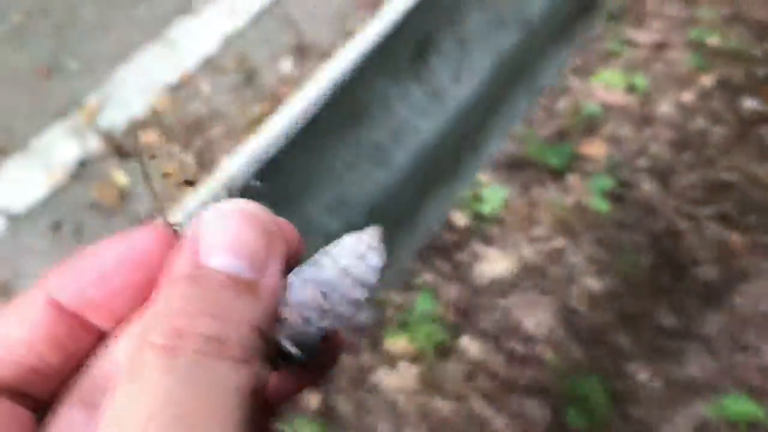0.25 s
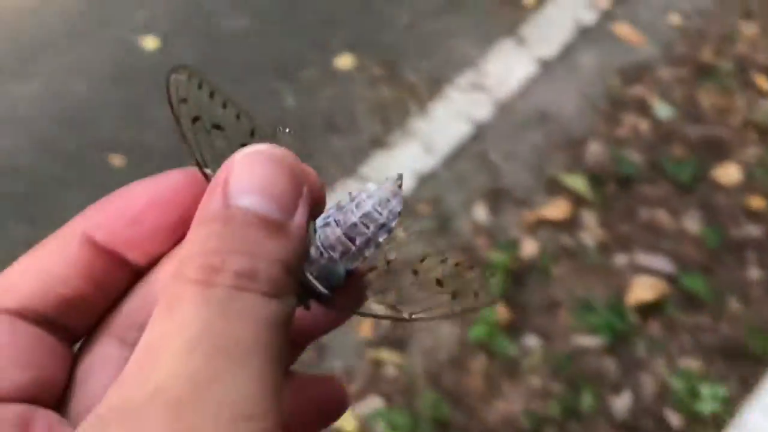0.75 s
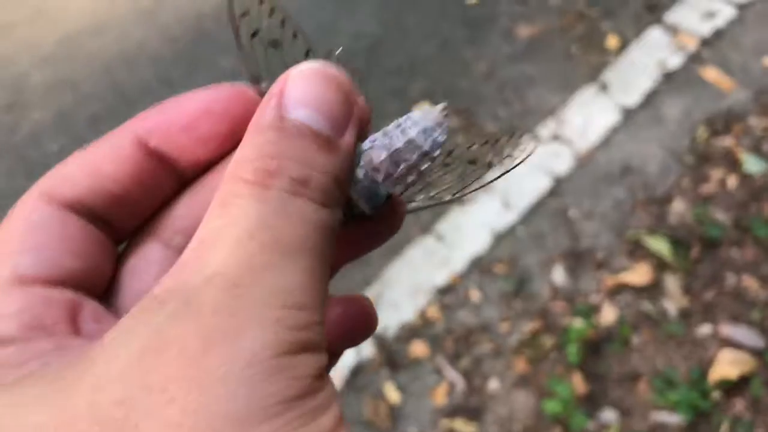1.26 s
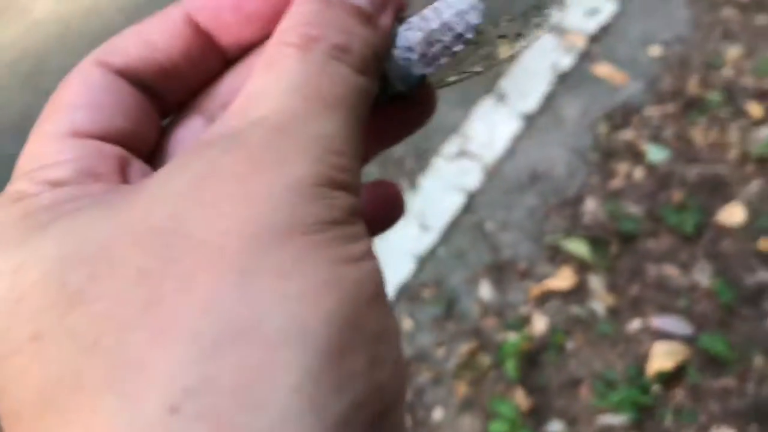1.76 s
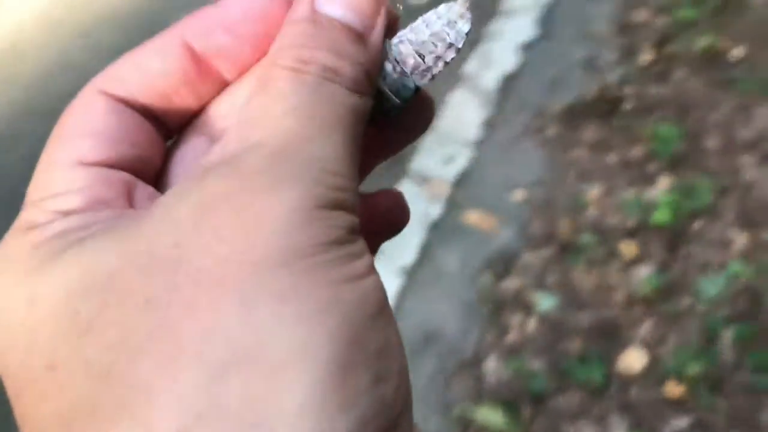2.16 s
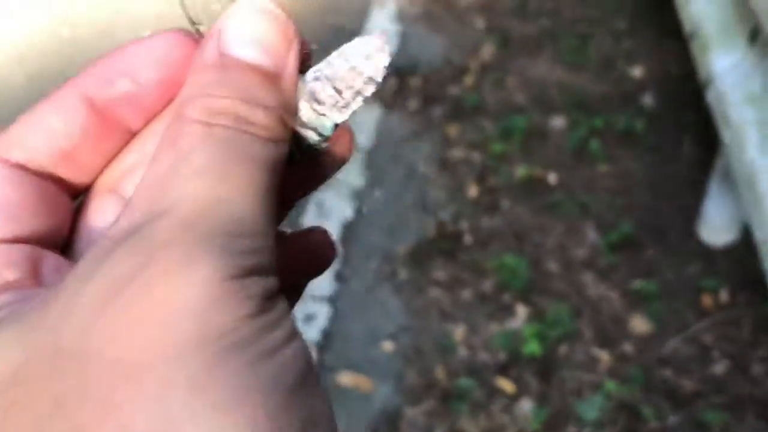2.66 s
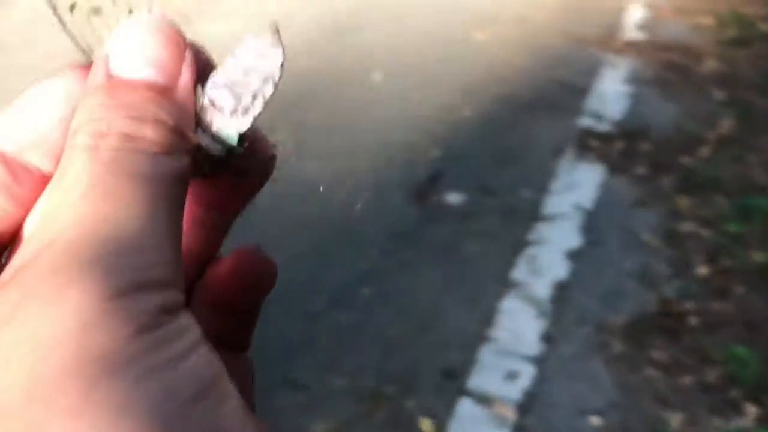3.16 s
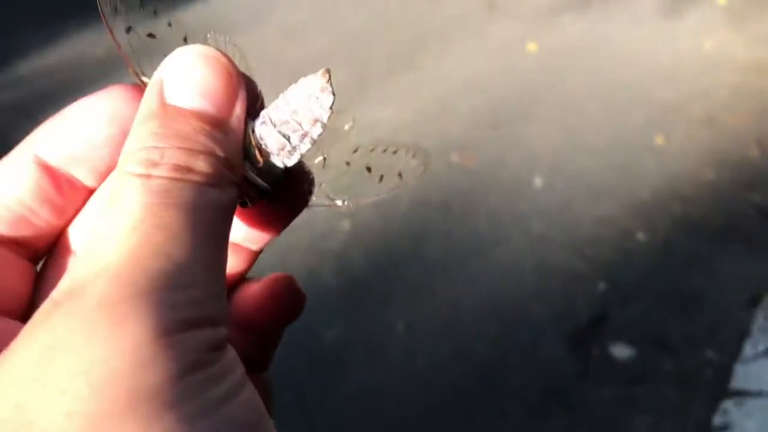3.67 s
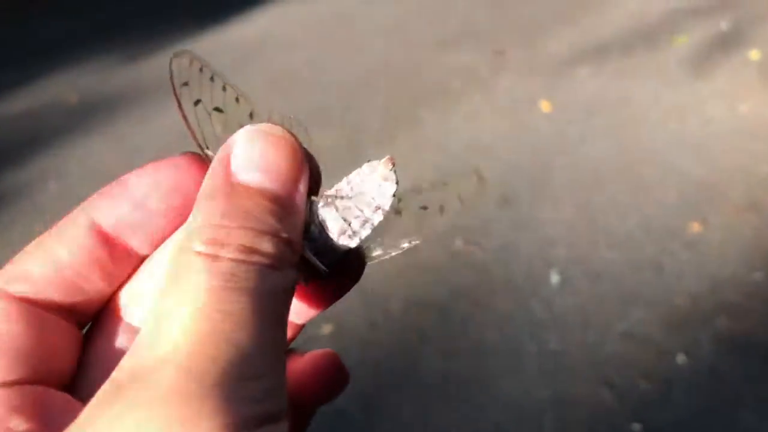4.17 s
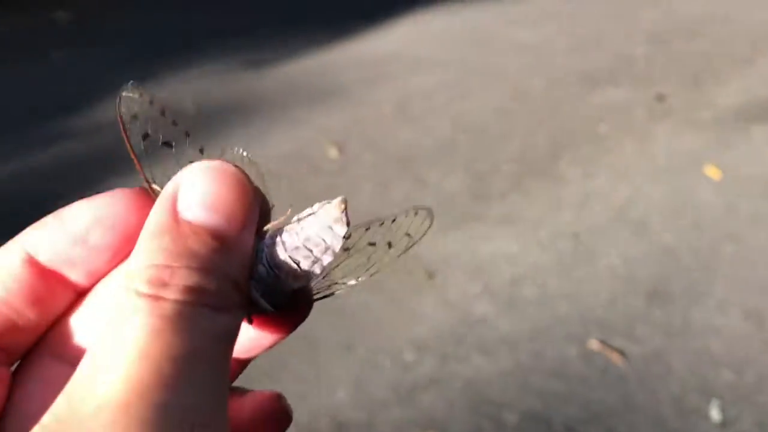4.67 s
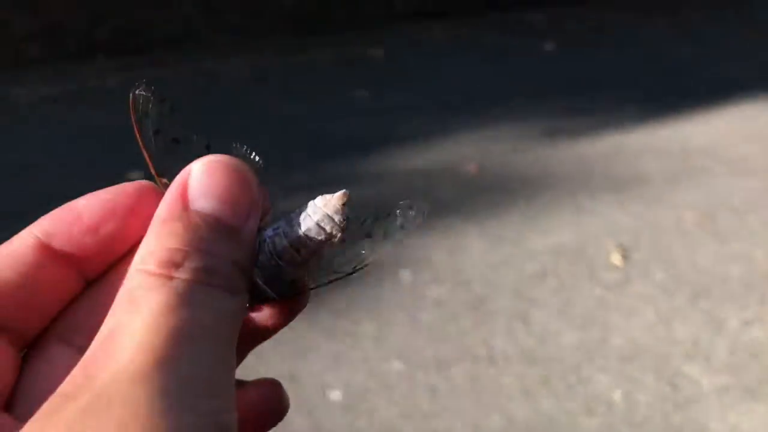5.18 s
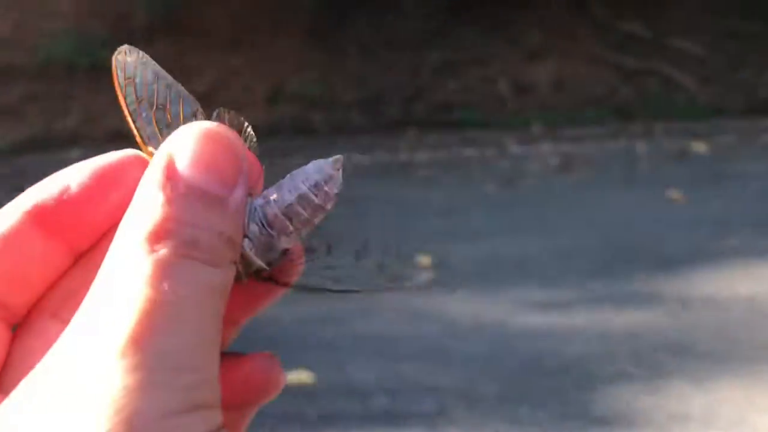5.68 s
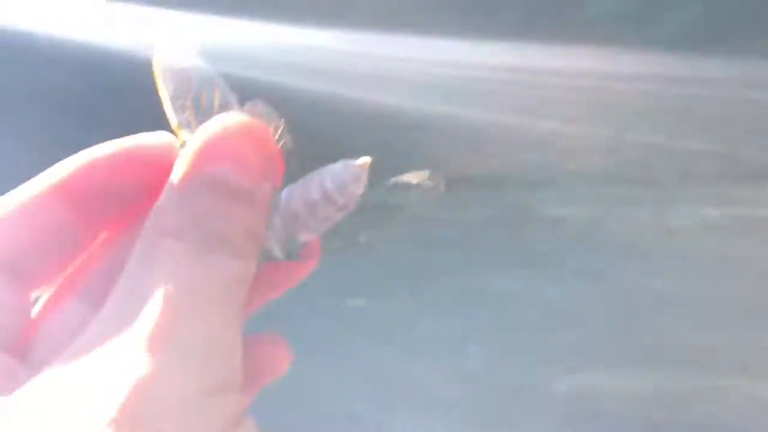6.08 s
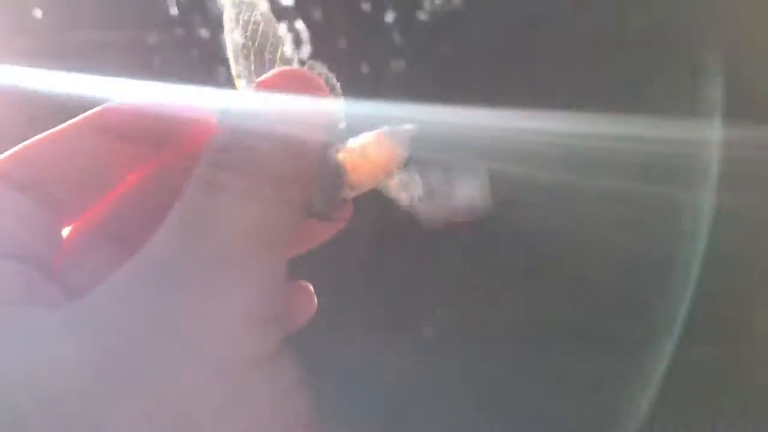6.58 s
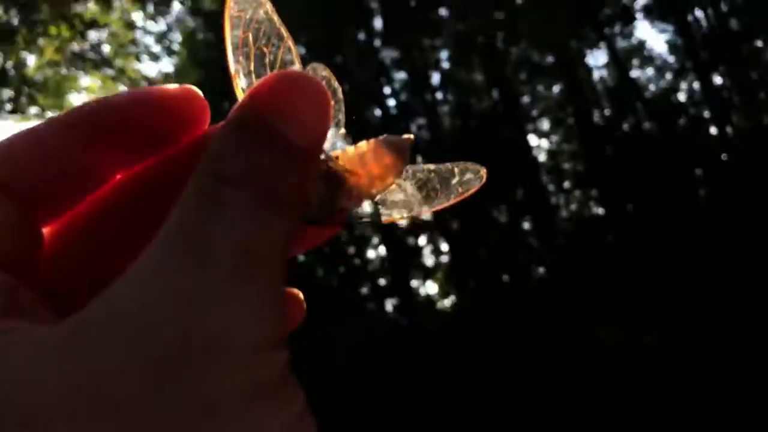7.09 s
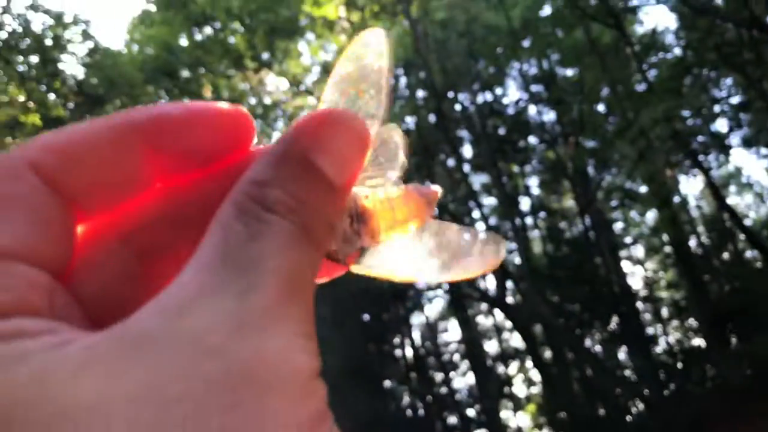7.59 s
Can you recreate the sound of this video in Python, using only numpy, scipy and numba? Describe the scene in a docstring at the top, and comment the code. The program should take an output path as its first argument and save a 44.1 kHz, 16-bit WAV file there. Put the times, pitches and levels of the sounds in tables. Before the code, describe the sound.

A cicada held in the fingers close to the microphone squawks in short, bright buzzing chirps, three or four a second, each a fast burst of ringing clicks. Single clicks and soft papery wing flicks fall between. Midway the chirps become duller, then dry and rough near six seconds, then bright again. A high, steady hiss of distant cicadas fills the woodland roadside, dipping under each loud chirp.

```python
"""Woodland road, a cicada held between the fingers a hand's length from the microphone; far chorus all through.
From the start it gives short chirps, its two tymbals buckling in turn about 260 times a second, each click a
2 kHz ring rich in overtones; lone clicks fall between, and the wings rustle and flick the fingers.
From 4 s the abdomen is mostly closed; three rough, dry chirps come near 6 s, then open, bright ones to the end.
The recorder's gain control pushes the chorus down at the chirps and lets it back up in the longer pauses."""
import sys
import numpy as np
from scipy import signal
from scipy.fft import rfft
from scipy.io import wavfile
from scipy.ndimage import uniform_filter1d, minimum_filter1d
from numba import njit

SR = 44100
rng = np.random.default_rng(int(sys.argv[2]) if len(sys.argv) > 2 else 0)


def materialize(psi):
    """Save the field psi as 16-bit PCM at rate SR to the path in sys.argv[1].

    A 1-D psi becomes a single channel; in a 2-D psi each row is a channel.
    """
    bounded = np.clip(np.atleast_2d(psi).T, -1, 1)
    quanta = np.round(bounded * 32767).astype(np.int16)
    wavfile.write(sys.argv[1], SR, quanta)


N = 345744
TIME = np.arange(N) / SR  # s

# Levels stand ahead of the recorder's gain control. Noise colours are relative: noise() scales them to rms 1.
# distant chorus, level before its shimmer: (time [s], level [dB])
CHORUS_LEVEL = [(0, -39.5), (2, -35), (3, -38.5), (4, -35), (6, -33.5), (7.84, -36.5)]
# colour of the distant chorus: (frequency [Hz], level [dB])
CHORUS_COLOUR = [(2500, -56), (3700, -28.5), (4400, -16.5), (5300, -13.5), (6200, -8), (7600, -4),
                 (8350, 2), (9200, -6), (10200, -17.5), (11500, -24), (13500, -18.5), (16000, -24)]
# speed of the chorus's shimmer: (frequency [Hz], level [dB])
SHIMMER_COLOUR = [(2, 14), (60, -3.5), (250, -1), (600, -64.5)]
# colour of low rumble and still air: (frequency [Hz], level [dB])
AIR_COLOUR = [(20, -40), (40, -15.5), (65, 1.5), (110, -5), (250, -10.5), (600, -20.5), (1000, -11.5),
              (1600, -17), (3000, -16.5), (8000, -24.5)]

# how hard the wings struggle, a gain on their rustle and the low flutter: (time [s], level [dB])
STRUGGLE_LEVEL = [(0, 10), (.8, 3), (1.4, -1.5), (2.2, 9), (2.9, 3), (3.8, -2), (4.6, 5.5), (5.6, 2.5),
                  (6.3, -1), (7.1, -11.5), (7.8, 5)]
# colour of wings brushing the fingers, and speed of its patches: (frequency [Hz], level [dB])
RUSTLE_COLOUR = [(80, -4), (300, 2), (1200, -9), (3000, -10), (7000, -19.5)]
PATCH_COLOUR = [(2, -14), (8, -14), (40, -1), (200, -58.5), (1000, -91.5)]
# colour of the low flutter: (frequency [Hz], level [dB])
FLUTTER_COLOUR = [(20, -5), (45, 1), (70, 5), (130, -7), (400, -21.5), (1500, -76.5)]
# the loudest wing flicks, relative to each other: (time [s], level [dB])
FLICKS = [(0.36, -33), (0.516, -37), (.708, -33), (3.467, -43), (4.147, -32.5), (4.53, -27.5),
          (4.611, -28.5), (4.641, -33.5), (4.968, -32.5), (5.450, -31), (5.652, -35.5), (7.304, -40.5),
          (7.743, -37.5)]
# colour of a flick's papery rustle: (frequency [Hz], level [dB])
PAPER_COLOUR = [(60, 3.5), (400, -3.5), (1100, -4.5), (2000, -3), (6000, -21)]

# chirps: (start [s], end [s], swell time [s], full level [dB], abdomen opening [0-1], roughness [0-1])
CHIRPS = [(0.061, 0.151, .022, -6, 0.83, 0.25), (.331, 0.419, .018, -6, 0.83, 0.09),
          (.912, 1.036, .036, -9.5, 0.62, 0.32), (1.198, 1.274, 0.014, -6.5, 0.55, 0.04),
          (1.442, 1.549, 0.036, -5, 0.54, 0.15), (1.968, 2.052, .008, -6.5, 0.1, 0),
          (2.191, 2.286, .026, -6.5, 0.5, 0), (2.452, 2.554, 0.019, -5, 0.78, 0.11),
          (2.7, 2.77, 0.014, -6.5, 0.83, 0.16), (2.917, 3.014, 0.025, -5, .85, 0.2),
          (3.203, 3.271, 0.013, -6.5, 0.78, 0.01), (3.515, 3.607, 0.025, -3.5, 0.81, .1),
          (3.834, 3.912, .016, -5, 0.5, 0), (4.209, 4.281, .01, -6, 0.26, 0.18),
          (4.53, 4.603, 0.0066, -6.5, 0.07, 0.03), (4.841, 4.908, 0.011, -7, 0.26, 0.17),
          (5.131, 5.213, .012, -7, 0.13, 0), (5.37, 5.45, 0.01, -8, .05, 0.3),
          (5.792, 5.85, .01, -10.5, 0.14, 0.77), (6.088, 6.153, .012, -9.5, 0.15, 0.76),
          (6.341, 6.423, .024, -11.5, 0.64, 0.68), (6.571, 6.657, 0.022, -5.5, 0.86, 0),
          (6.91, 6.993, 0.0089, -5, .7, 0), (7.318, 7.387, 0.0087, -7, 0.67, 0.06),
          (7.597, 7.688, 0.015, -10, .7, 0), (7.774, 7.855, 0.023, -3.5, 0.96, 0.03)]
# lone clicks between the chirps: (time [s], level [dB])
LONE_CLICKS = [(0.015, -21.5), (.053, -12.5), (.16, -7.5), (.429, -7.5), (.437, -7), (1.172, -15.5),
               (1.177, -13.5), (1.556, -5.5), (1.722, -14.5), (1.732, -13.5), (1.737, -12.5), (1.925, -18),
               (2.58, -7), (3.142, -18.5), (4.181, -13.5), (4.471, -12.5), (4.485, -11.5), (4.518, -12.5),
               (4.522, -7.5), (4.751, -14), (4.819, -15), (4.832, -15.5), (5.102, -15.5), (5.125, -16),
               (5.353, -12.5), (5.691, -18.5), (5.76, -20), (5.783, -22), (6.17, -9), (7.188, -17.5),
               (7.308, -14), (7.398, -5)]
# partials of the ring: (multiple of its pitch, level, abdomen closed [dB], level, abdomen open [dB])
PARTIALS = [(1.03, -7.5, -13.5), (2.015, -2.5, -0.5), (2.925, -4.5, -6.5), (4.04, -19.5, 1),
            (4.91, -12.5, -7.5), (5.94, -22.5, -16), (6.85, -26.5, -24.5)]
# colour of the buckling ribs' rasp: (frequency [Hz], level [dB])
RASP_COLOUR = [(100, -29.5), (950, -26.5), (1450, -23.5), (2150, -10), (2800, -5.5), (4500, 4), (6200, -3),
               (7400, -1.5), (9300, 10), (11300, -3), (16000, -7.5)]
# colour of a tymbal springing back after its click: (frequency [Hz], level [dB])
REBOUND_COLOUR = [(300, -42), (1300, -17.5), (2300, -19), (3100, -14.5), (4500, -9), (5400, 7), (6100, 19),
                  (7300, -18), (9200, -3.5), (10800, -6), (12200, -2), (13800, -13), (15300, -7.5)]

CLICK_HZ = 262  # nominal clicks per second of both tymbals together
RING_HZ = 2079  # nominal pitch of a tense tymbal, ahead of climb, settling and partial multiples
LIMP_DB = -19.5  # level of the first, limp click of a chirp
DETUNE = .003  # click-to-click pitch scatter [share] in a smooth chirp
RISE_S = .0011  # time constant of a click's swell, abdomen closed
ROUGH_STRETCH = .05  # share by which high partials go sharp at full roughness
DIP_HZ, DIP_WIDTH_HZ = 2800, 600  # the body's weak band
LINGER_HZ, LINGER_DB = 2130, -54  # lingering ring: pitch, response level against the call
HAND_DB = -18  # response level of the hand's scatter against the call
WOODS_DB, WOODS_T60_S = -37.5, .26  # echo from the trees: response level against the call, 60 dB decay
TOP_HZ = 15850  # top of the recorder's band


def undb(db):
    """Decibels to gain."""
    return 10 ** (np.asarray(db) / 20)


def unit(x):
    """Scale to rms 1."""
    return x / np.sqrt(np.mean(x ** 2))


def add(track, sound, at):
    """Mix a sound into a track from a sample index on."""
    at = max(at, 0)
    part = sound[:max(len(track) - at, 0)]
    track[at:at + len(part)] += part


def noise(colour):
    """Noise of rms 1, its spectrum shaped by a (Hz, dB) colour over log frequency."""
    hz, db = np.transpose(colour)
    f = np.maximum(np.fft.rfftfreq(N, 1 / SR), 1)
    gain = undb(np.interp(np.log(f), np.log(hz), db))
    white = rfft(rng.standard_normal(N))
    return unit(np.fft.irfft(white * gain, N))


def woodland(shimmer_db=0.4, air_db=-55.5):
    """Many far cicadas merge into a shimmering hiss over a low rumble of air."""
    level_db = np.interp(TIME, *np.transpose(CHORUS_LEVEL))
    shimmer = noise(SHIMMER_COLOUR)
    chorus = noise(CHORUS_COLOUR) * undb(level_db + shimmer_db * shimmer)
    return chorus + noise(AIR_COLOUR) * undb(air_db)


def struggle():
    """Gain of the wings' effort over time."""
    return undb(np.interp(TIME, *np.transpose(STRUGGLE_LEVEL)))


def wing_rustle(base_db=-65.0, patchy_db=5.0):
    """The wings brush the fingers in faint, uneven patches; the struggle scales them later."""
    touch = np.minimum(noise(PATCH_COLOUR), 2)
    return undb(base_db + patchy_db * touch) * noise(RUSTLE_COLOUR)


def wing_flicks(start_hz=1284.0, fall_s=0.00432, decay_s=0.005, rise_s=0.00019, rustle=0.56, slap_db=2.5):
    """A wing slaps the fingers: a soft tap that falls quickly in pitch, with a papery rustle."""
    out, t = np.zeros(N), TIME[:SR // 25]
    paper = noise(PAPER_COLOUR)
    tap = np.sin(2 * np.pi * start_hz * fall_s * (1 - np.exp(-t / fall_s)))
    envelope = (1 - np.exp(-t / rise_s)) * np.exp(-t / decay_s)
    for s, db in FLICKS:
        at = int(s * SR)
        slap = tap + rustle * paper[at:at + len(t)]
        add(out, undb(db + slap_db) * envelope * slap, at)
    return out


def low_flutter(call, base_db=-45.0, smear_s=0.063, lag_s=0.019):
    """A soft low flutter follows each chirp's smeared power; the struggle scales it later."""
    power = uniform_filter1d(call ** 2, int(smear_s * SR))
    strength = np.sqrt(np.abs(np.interp(TIME - lag_s, TIME, power)))
    return undb(base_db) * strength * noise(FLUTTER_COLOUR)


def after_ring(call, ring_t60_s=0.46, hand_t60_s=0.03):
    """The hand and the trees scatter a little sound back, and a faint ring lingers near the call's pitch."""
    t = TIME[:SR // 3]
    ring = np.sin(2 * np.pi * LINGER_HZ * t) * undb(-60 * t / ring_t60_s)
    hand = rng.standard_normal(len(t)) * undb(-60 * t / hand_t60_s)
    woods = rng.standard_normal(len(t)) * undb(-60 * t / WOODS_T60_S)
    tails = ((ring, LINGER_DB), (hand, HAND_DB), (woods, WOODS_DB))
    response = sum(undb(db) * tail / np.linalg.norm(tail) for tail, db in tails)
    return signal.oaconvolve(call, response)[:N]


def click_train(swell_shape=1.5, slack=.17, sag=0.059, climb=0.01, lopsided=0.039, open_lopsided=.12,
                pace_scatter=.012, tiring=.04, jitter_s=.00003, rough_jitter_s=.00012, scatter_db=0.92,
                tense_db=-5.5, tense_range_db=12.0, dull_db=-2.5, limp_closing=0.94,
                hitch_at=.5, hitch=.14, slow_start_s=.019):
    """Every click as muscles tense the tymbals: (s, dB, pitch Hz, opening, roughness, dB per overtone)."""
    clicks = []
    for s, db in LONE_CLICKS:
        # the softer a lone click, the flatter and duller
        limp = np.clip((tense_db - db) / tense_range_db, 0, 1)
        # the abdomen keeps the pose of the chirp whose end is nearest
        opening = min(CHIRPS, key=lambda chirp: abs(chirp[1] - s))[4]
        pitch = RING_HZ * (1 - climb - sag * limp)
        clicks.append((s, db, pitch, opening * (1 - limp), 0, dull_db * limp))
    for start, end, swell_s, db, opening, rough in CHIRPS:
        s = start
        pace = CLICK_HZ * (1 + pace_scatter * rng.standard_normal())
        caught = swell_s < slow_start_s
        for k, (late, loud) in enumerate(rng.standard_normal((40, 2))):
            if s > end + 1 / CLICK_HZ / 2:
                break
            # until the muscles tense, clicks are slow, soft, flat and dull
            limp = np.exp(-((s - start) / swell_s) ** swell_shape)
            along = (s - start) / (end - start) - .5
            pitch = RING_HZ * (1 - sag * limp + climb * along)  # tension keeps growing to the end
            when = s + (jitter_s + rough_jitter_s * rough) * late
            level_db = db + (LIMP_DB - db) * limp + scatter_db * loud
            pose = opening * (1 - limp_closing * limp)
            clicks.append((when, level_db, pitch, pose, rough, dull_db * limp))
            # left and right tymbal take turns, not quite evenly, and slow a little towards the end
            uneven = (-1) ** k * (lopsided + open_lopsided * opening)
            s += (1 + slack * limp + tiring * along - uneven) / pace
            # a slow start stutters once before it catches
            if not caught and s > start + hitch_at * swell_s:
                s, caught = s + hitch * swell_s, True
    return clicks


def tymbals(open_rise_s=0.001, ring_s=0.0019, open_ring_s=0.0034, lead_s=0.002, glide=0.056, glide_s=0.0011,
            settle=0.97, rough_detune=.005, rough_damping=0.89, rough_db=2.5, twist=0.32, overtone_fade=0.55,
            uneven_db=1.6, rasp_db=-9.0, rebound_db=1.0, open_noise_db=-4.0,
            rebound_s=0.0037, rebound_width_s=0.00064):
    """Clicks swell in about 1 ms, drop in pitch, die and spring back; an open abdomen rings longer, brighter."""
    rasp, rebound = noise(RASP_COLOUR), noise(REBOUND_COLOUR)
    ring, rasp_level, rebound_level = np.zeros((3, N))
    multiple, closed_db, open_db = np.transpose(PARTIALS)[:, :, None]
    click_samples = SR / CLICK_HZ
    for s, db, hz, opening, rough, dull_db in click_train():
        chance = rng.standard_normal((len(PARTIALS) + 1, 1))
        at = int((s - lead_s) * SR)
        t = np.maximum((at + np.arange(300)) / SR - (s - lead_s), 0)

        rise = RISE_S + opening * (open_rise_s - RISE_S)
        fall = ring_s + opening * (open_ring_s - ring_s)
        fall /= 1 + rough_damping * rough  # rough chirps are made of shorter, drier clicks
        swell = (1 - np.exp(-(t / rise) ** 2)) * np.exp(-(t / fall) ** 1.87)
        # with the abdomen closed, high partials hug the peak
        shapes = swell ** (1 + overtone_fade * (1 - opening) * (multiple - 2))
        shapes /= np.sqrt(np.sum(shapes ** 2, axis=1, keepdims=True) / click_samples)

        settled_hz = hz * settle * (1 + (DETUNE + rough_detune * rough) * chance[0])
        turns = settled_hz * (t - glide * glide_s * np.exp(-t / glide_s))
        # in rough chirps the high partials go sharp
        stretched = multiple * (1 + ROUGH_STRETCH * rough * np.clip(multiple - 2, 0, 1))
        # the body delays each partial differently
        waves = np.sqrt(2) * np.sin(2 * np.pi * stretched * turns + twist * multiple ** 2)
        partial_db = closed_db + opening * (open_db - closed_db)
        partial_db = partial_db + dull_db * np.maximum(multiple - 2, 0) + uneven_db * chance[1:]
        add(ring, np.sum(undb(db + partial_db) * shapes * waves, axis=0), at)

        noisy = undb(db + open_noise_db * opening)
        add(rasp_level, noisy * undb(rasp_db + rough_db * rough) * shapes[0], at)
        spring = np.exp(-((t - rebound_s) / rebound_width_s) ** 2)
        add(rebound_level, noisy * undb(rebound_db) * spring, at)
    return ring + rasp * rasp_level + rebound * rebound_level


def body_dip(x, depth=0.25):
    """The body radiates poorly between its first two resonances."""
    b, a = signal.iirpeak(DIP_HZ, DIP_HZ / DIP_WIDTH_HZ, fs=SR)
    return x - np.clip(depth, 0, 1) * signal.lfilter(b, a, x)


def scene():
    """The held cicada close to the microphone, in front of the woodland."""
    around = woodland() + wing_flicks() + struggle() * wing_rustle()
    call = body_dip(tymbals())
    return (around + call + after_ring(call) + struggle() * low_flutter(call))[None]


@njit
def hold_and_release(wanted, start, hold_s, release_s, margin):
    """Follow a wanted cut in gain at once, keep it after the sound has dropped by a margin, then let it go."""
    out, cut, quiet_s = np.empty(len(wanted)), start, 0.
    for i in range(len(wanted)):
        quiet_s = 0. if wanted[i] > max(cut - margin, cut / 2) else quiet_s + 1 / SR
        if quiet_s > hold_s:
            cut -= cut / (release_s * SR)
        cut = max(cut, wanted[i])
        out[i] = cut
    return out


def gain_control(x, threshold_db=-14.5, ratio=2.67, sense_s=0.0083, hold_s=.15, release_s=0.043,
                 margin_db=5.0, start_cut_db=6.5, ease_s=0.0052):
    """The recorder turns itself down for loud sound, waits, and comes back up."""
    power = uniform_filter1d(x ** 2, int(sense_s * SR))
    level_db = 10 * np.log10(np.abs(power) + 1e-12)
    wanted_db = np.maximum(level_db - threshold_db, 0) * (1 - 1 / ratio)
    cut_db = hold_and_release(wanted_db, float(start_cut_db), float(hold_s), float(release_s), float(margin_db))
    return x * undb(-uniform_filter1d(cut_db, int(ease_s * SR)))


def record(dry, ceiling=1.0, hold_s=0.00079):
    """Gain control evens out the chirps, a fast limiter restrains the loudest clicks, and the top is cut."""
    even = gain_control(dry[0])[None]
    size = int(hold_s * SR)
    needed = ceiling / np.maximum(np.abs(even), ceiling)
    gain = uniform_filter1d(minimum_filter1d(needed, size), size)
    low_pass = signal.ellip(10, .2, 80, TOP_HZ, fs=SR, output="sos")
    return signal.sosfilt(low_pass, even * gain)


dry = scene()
out = record(dry)
materialize(out)
```